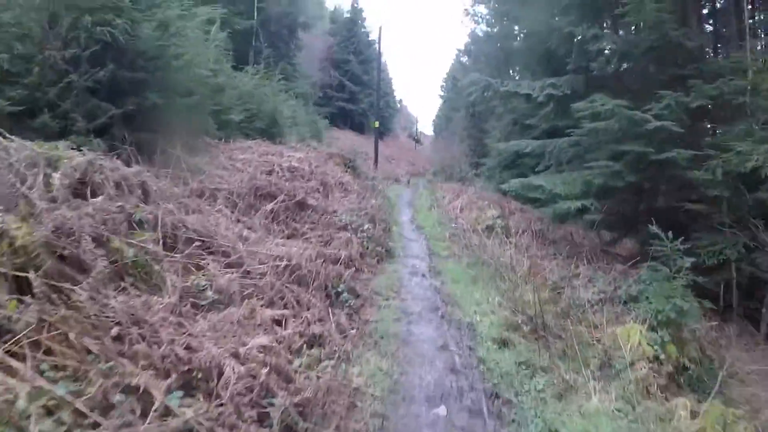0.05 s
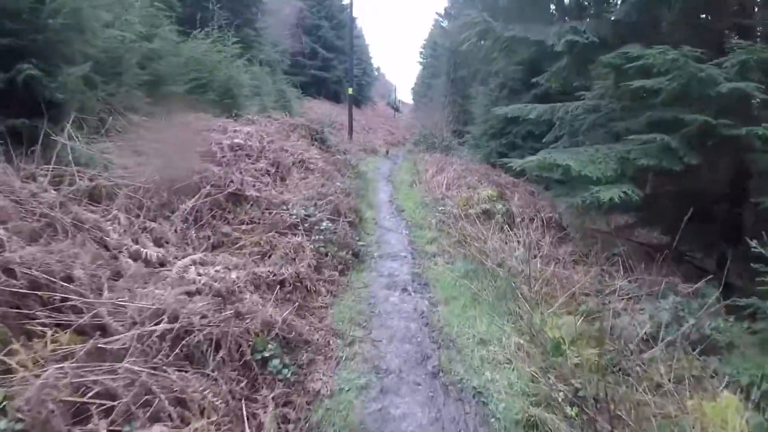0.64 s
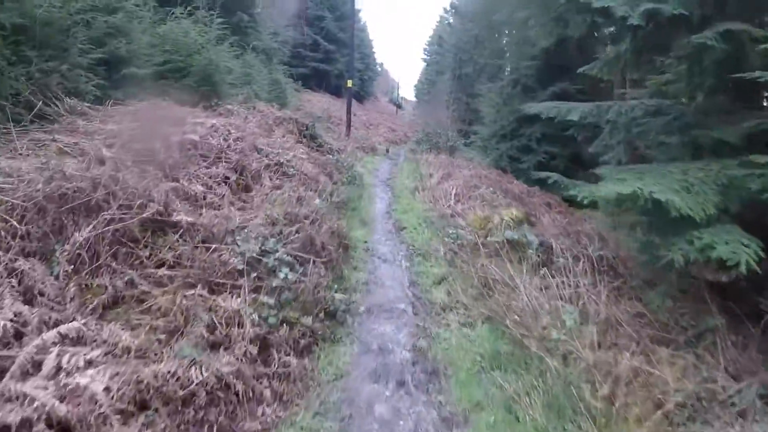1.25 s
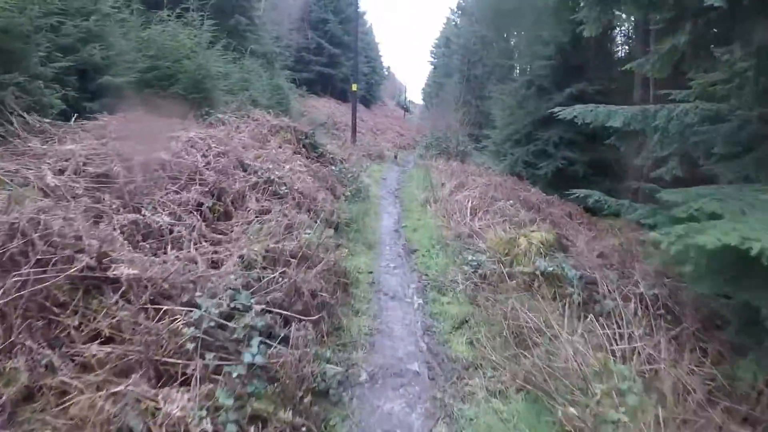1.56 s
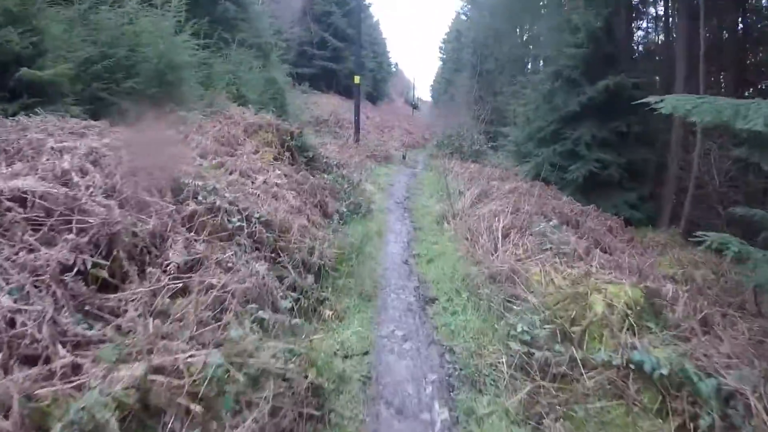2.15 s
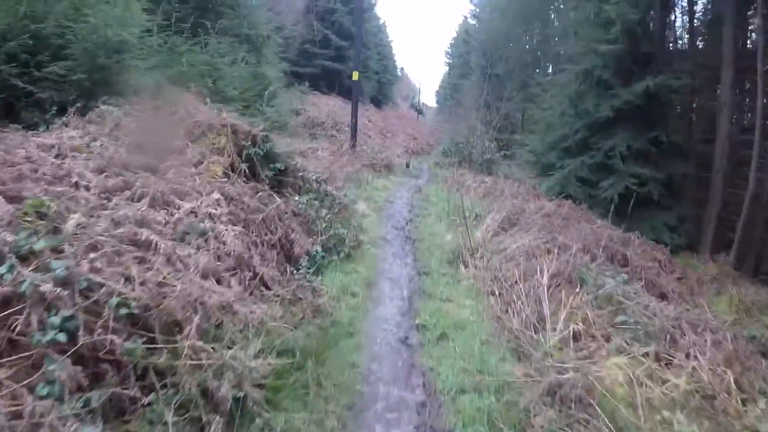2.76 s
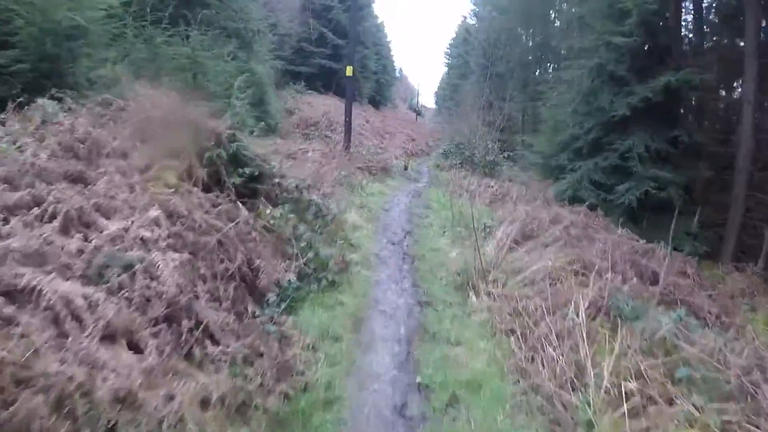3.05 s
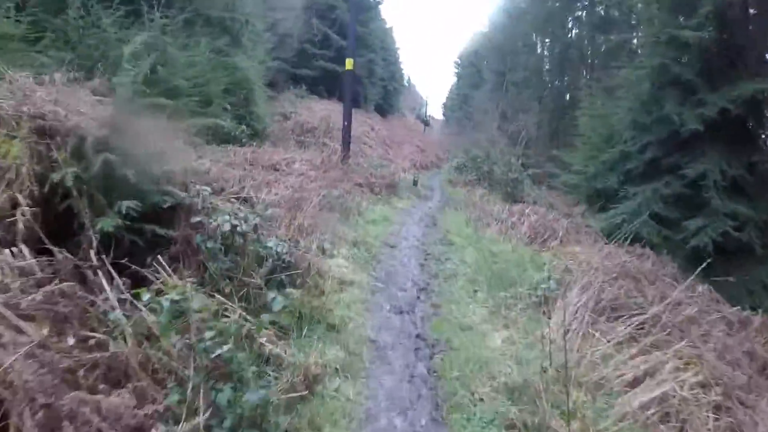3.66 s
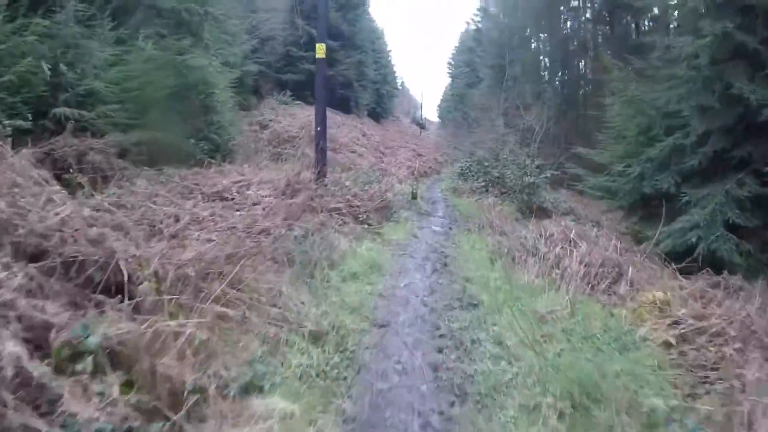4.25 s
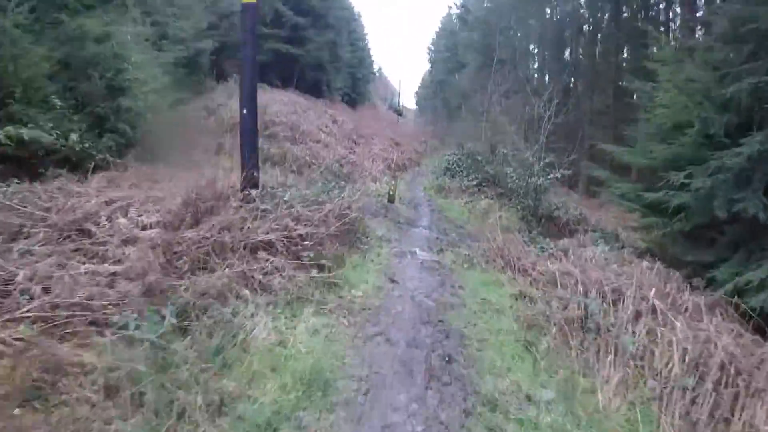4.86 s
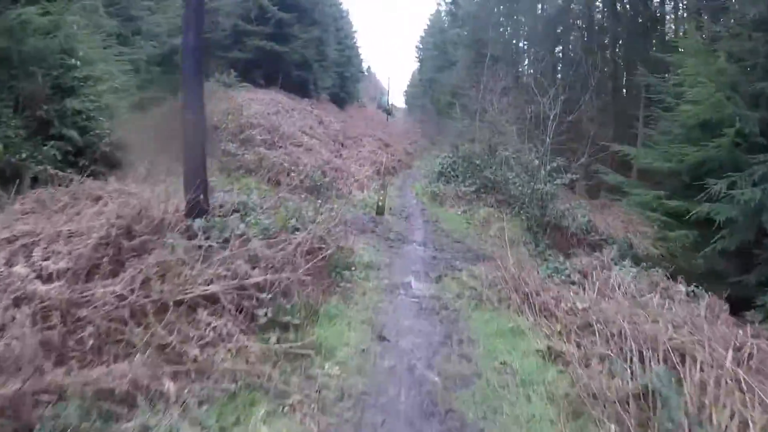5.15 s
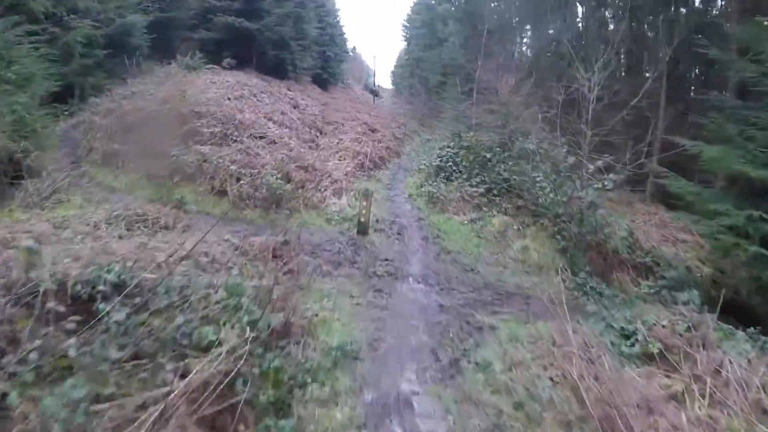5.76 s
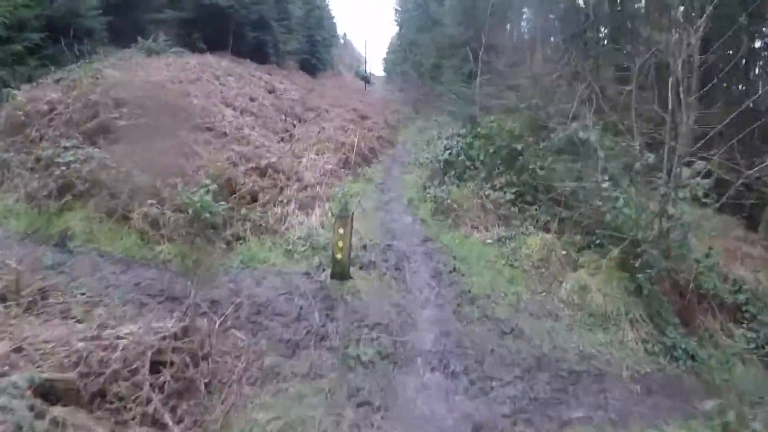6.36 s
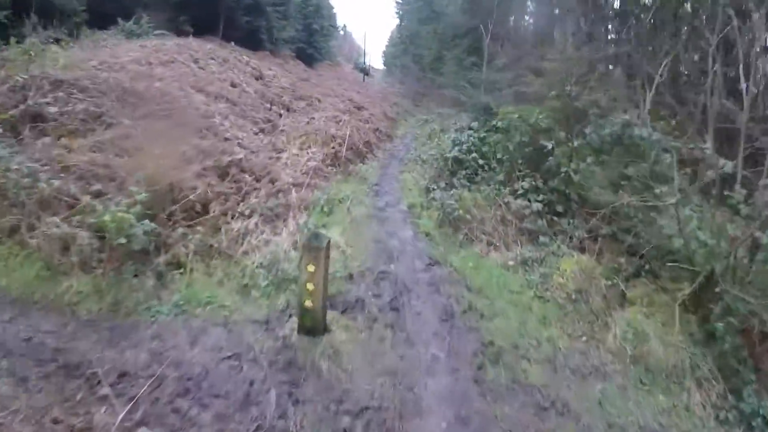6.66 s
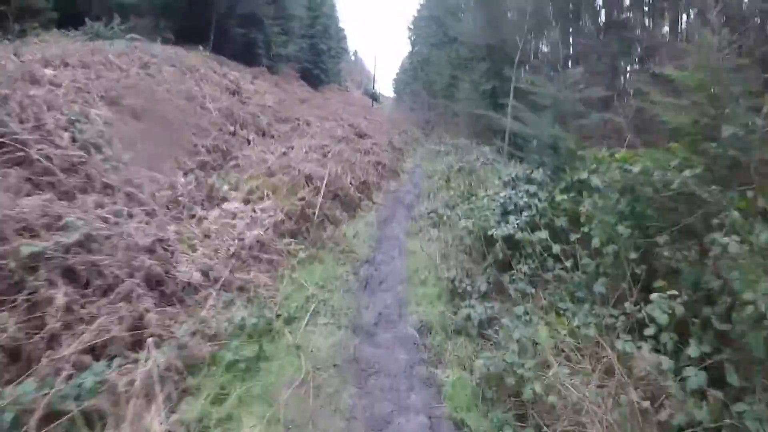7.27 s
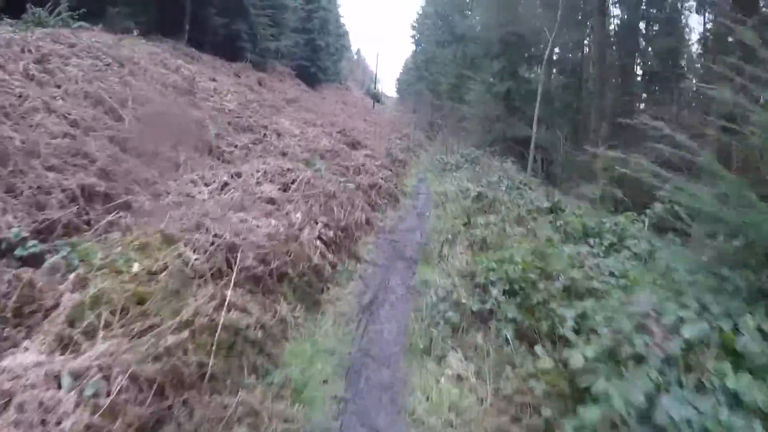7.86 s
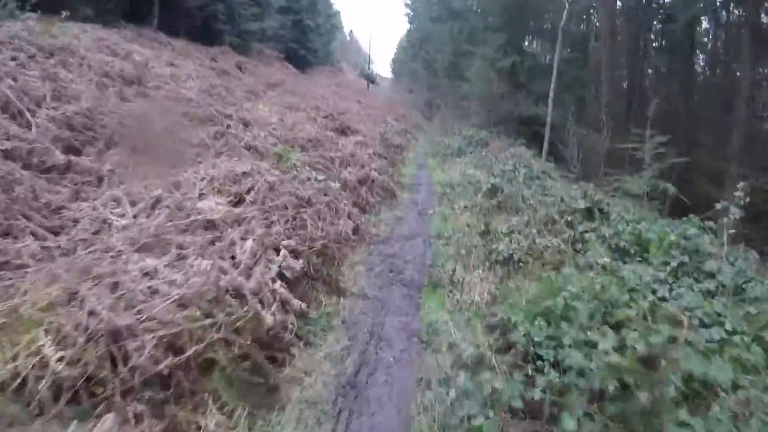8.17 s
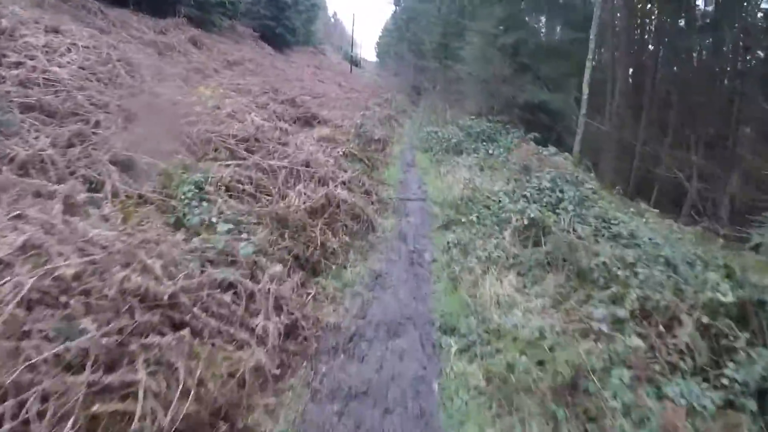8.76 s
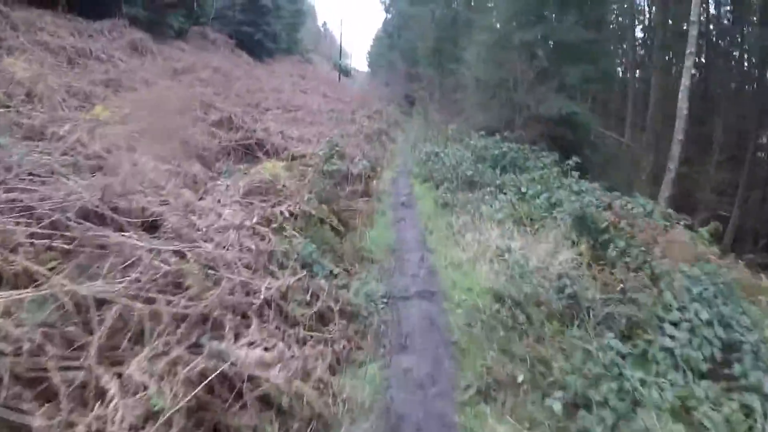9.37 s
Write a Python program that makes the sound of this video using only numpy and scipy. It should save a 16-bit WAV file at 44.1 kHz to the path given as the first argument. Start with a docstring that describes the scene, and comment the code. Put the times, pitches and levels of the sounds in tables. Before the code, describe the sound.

A mountain bike gathers speed along a muddy woodland path, heard close from a small camera on the rider. For the first two seconds the tyres hiss and crackle softly on wet ground, the chain and cables tick, and a brake sings faintly near 0.9 seconds. From about 2 seconds wind builds on the microphone as a low, buffeting rumble, while mud squelches, stones click and the frame knocks now and then. The hardest bumps come near 6.3 and 7.2 seconds, clusters of knocks and squelches that thud through the camera mount; the second brings a brief splash and a sizzle of water. The chain clinks against metal at 8.2 seconds. A few more knocks and squelches follow around 9 seconds, and the wind stays strong until the end at about 9.4 seconds. A dull, regular electrical putter runs underneath.

```python
"""A mountain bike gathers speed on a muddy woodland path, heard from a small camera on the rider.
At first the tyres hiss and crackle softly, chain and cables tick, and a brake sings faintly near 0.9 s.
From 2 s the wind builds on the microphone while mud squelches, stones click and the frame knocks.
The hardest bumps, near 6.3 s and 7.2 s, thud through the camera mount; the second brings a splash.
The chain clinks at 8.2 s, and the ride ends in strong wind over the dull putter of the camera's radio."""
import sys
import numpy as np
from scipy import signal
from scipy.fft import rfft, irfft
from scipy.io import wavfile
from scipy.ndimage import uniform_filter1d

SR = 44100
rng = np.random.default_rng(int(sys.argv[2]) if len(sys.argv) > 2 else 0)


def pcm_store(signal):
    """Save signal as 16-bit PCM."""
    levels = np.round(np.clip(np.atleast_2d(signal), -1, 1) * 32767)
    wavfile.write(sys.argv[1], SR, levels.astype(np.int16).T)


N = 415422
TIME = np.arange(N) / SR
HIT_TIME = np.arange(SR // 8) / SR  # time axis of one impact


# water sizzling off the tread: time_s, level_db
SIZZLE_CURVE = [(0, -34.5), (.25, -55.5), (1.1, -46), (1.7, -57), (2.6, -48), (3.3, -42.5), (3.65, -55),
                (4.0, -41.5), (4.95, -41), (5.4, -41.5), (6.0, -53), (6.45, -37.5), (6.85, -44),
                (7.15, -32), (7.75, -47.5), (8.5, -38), (9.42, -38)]
# spectra of the tread, the sizzle and the fine spray: frequency_hz, gain_db
TREAD_SPECTRUM = [(250, -17), (600, -2.5), (900, -7.5), (1250, -4), (1650, 0.5), (2200, -1.5), (2900, -2),
                  (3700, 0.5), (4450, 0.5), (5000, -5.5), (5600, -14.5), (7000, -36)]
SIZZLE_SPECTRUM = [(1500, -11.5), (2900, -4), (3300, -0.5), (4550, 1.5), (5000, -5), (5600, -27.5),
                   (8000, -40)]
SPRAY_SPECTRUM = [(4500, -21), (5700, -0.5), (6300, 6.5), (7100, 3.5), (7900, -4), (8700, -2), (9800, -5),
                  (11300, -18.5), (12700, -9), (15500, -32)]

def tyres():
    """Rolling noise: tread peels off wet ground in spurts, under a finer, steadier spray."""
    roll_db = rolling_level()
    sizzle_db, = in_time(SIZZLE_CURVE)
    grains, clicks = tread_bursts(per_s=700, spread_db=2.5, t60_cycles=5.4)
    bubbles, _ = tread_bursts(per_s=500, spread_db=2.0, t60_cycles=150)
    surge = crunches(per_s=42, strength=3.5, fade_s=.009)
    hiss = coloured(noise(), TREAD_SPECTRUM)
    tread = from_db(-2.5) * hiss + from_db(-4.5) * grains + from_db(-4.0) * bubbles
    sizzle = coloured(noise() + 0.5 * clicks, SIZZLE_SPECTRUM) * from_db(sizzle_db - 5.5)
    spray = coloured(noise() + 0.76 * clicks, SPRAY_SPECTRUM)
    wet_db = (roll_db + sizzle_db) / 2  # spray follows both tread and water
    spray_db = -62 + 0.94 * (wet_db - wet_db.mean())
    return (from_db(roll_db) * tread + sizzle) * surge + from_db(spray_db) * spray * np.sqrt(surge)


# rolling noise on firm ground: time_s, level_db
ROLLING_CURVE = [(0, -44), (.33, -55), (.55, -47), (1.75, -51), (2.7, -47.5), (3.7, -44.5), (4.9, -44),
                 (6.05, -46.5), (6.35, -45.5), (7.35, -40.5), (7.75, -44), (9.42, -43.5)]
# swells of hiss in wet patches: centre_s, level_db, half_width_s
WET_SWELLS = [(0.64, -43, 0.059), (1.183, -47, 0.1), (2.007, -45, 0.082), (3.177, -37, 0.04),
              (4.816, -33, 0.021), (5.04, -41.5, 0.064), (6.998, -34, 0.044), (7.244, -36.5, 0.094),
              (7.51, -34.5, 0.034), (8.877, -31, 0.021), (9.15, -36, 0.11)]

def rolling_level():
    """Incoherent sources add in power: firm ground plus wet patches, returned in dB."""
    firm_db, = in_time(ROLLING_CURVE)
    wet_power = sum(from_db(db) ** 2 * bell(s, half_s) for s, db, half_s in WET_SWELLS)
    return 10 * np.log10(from_db(firm_db) ** 2 + wet_power)


def tread_bursts(per_s, spread_db, t60_cycles, pitch_count=22):
    """Shot noise: grains or bubbles burst and resonate. Returns the ringing and the bare clicks."""
    sizes = from_db(spread_db * np.minimum(rng.exponential(1, N), 4))
    signs = rng.choice([-1, 1], N)
    clicks = sizes * signs * (rng.random(N) < per_s / SR)
    pitch_index = rng.integers(0, pitch_count, N)
    rings = sum(hz * ring(clicks * (pitch_index == k), hz, t60_cycles / hz)
                for k, hz in enumerate(np.geomspace(1100, 5000, pitch_count)))
    return rms_one(coloured(rings, TREAD_SPECTRUM)), rms_one(clicks)


def crunches(per_s, strength, fade_s):
    """Amplitude modulation: a gain that jumps as each clod gives way under the tread, then relaxes."""
    breaks = (rng.random(N) < per_s / SR) * np.minimum(rng.exponential(1, N), 2)
    power = signal.lfilter([1], [1, -np.exp(-1 / (fade_s * SR))], breaks + 1e-18)
    return rms_one(np.sqrt(1 + strength * power))


# mud squirting from under a tyre: start_s, level_db, pitch_hz
MUD_SQUIRTS = [(0.447, -28, 2780), (2.3337, -23, 3400), (3.1865, -23.5, 3830), (3.318, -22.5, 4200),
               (4.5093, -24, 3940), (4.805, -22.5, 1740), (4.935, -27, 3160), (4.988, -26, 3000),
               (5.241, -31, 3900), (5.329, -31, 3600), (6.1905, -22.5, 1940), (6.267, -20.5, 1400),
               (6.327, -19.5, 1100), (6.3432, -16.5, 2320), (6.537, -20, 1390), (6.5889, -20, 1520),
               (6.979, -18.5, 2300), (6.994, -25.5, 2300), (7.02, -29, 4200), (7.041, -28, 3400),
               (7.076, -25, 3400), (7.198, -20, 3600), (7.215, -18.5, 4500), (7.238, -20, 2620),
               (8.777, -27, 3800), (8.879, -21.5, 1740), (9.039, -27, 4400), (9.163, -27, 4500),
               (9.319, -18.5, 3450)]

def squelches(swell_s=0.0079, droplet_fade_s=0.01):
    """Damped resonance: spatter excites a pocket in the mud; higher squirts throw more droplets."""
    out = np.zeros(N)
    age = HIT_TIME / swell_s
    for s, db, hz in MUD_SQUIRTS:
        spatter = noise(len(age)) * age * np.exp(-age)
        pocket = ring(spatter, hz, 1.56 / hz)
        add(out, s - .002, at_level(coloured(pocket, TREAD_SPECTRUM), db - 8.5))
        droplets = noise(len(age)) * np.sqrt(age) * np.exp(-HIT_TIME / droplet_fade_s)
        add(out, s, at_level(coloured(droplets, SPRAY_SPECTRUM), db - 27.5) * hz / 3050)
    return out


# puddle water spraying up: centre_s, level_db
PUDDLE_SPLASHES = [(7.156, -56), (7.222, -49), (7.362, -56)]

def splashes():
    """Superposition: a fan of fine drops merges into a brief swell of bright noise."""
    drops = rms_one(highpass(noise(), hz=6500, order=2))
    return drops * sum(from_db(db) * bell(s, half_width_s=0.015) for s, db in PUDDLE_SPLASHES)


# big stones clicking out from under a tyre: start_s, level_db, pitch_hz
STONE_CLICKS = [(2.537, -29, 3280), (3.745, -28.5, 2600), (4.063, -26.5, 3250), (4.097, -28.5, 3600),
                (4.599, -30, 3900), (5.7213, -29.5, 3620), (5.787, -29, 4460), (5.939, -33, 3620),
                (9.3913, -29.5, 1490)]

def stones(grit_per_s=30, shower_db=7):
    """Poisson impacts: a few big stones click, while grit of drifting rate falls in showers."""
    big, small = np.zeros((2, N))
    for s, db, hz in STONE_CLICKS:
        add(big, s, at_level(coloured(pebble(hz), TREAD_SPECTRUM), db + 0.5))
    shower = from_db(shower_db * drift(5))
    grain_chance = grit_per_s * shower / shower.mean() / SR
    for s in TIME[rng.random(N) < grain_chance]:
        grain = pebble(hz=rng.uniform(1400, 4600))
        add(small, s, at_level(grain, db=rng.uniform(-8, 0)))
    return big + rms_one(coloured(small, TREAD_SPECTRUM)) * from_db(rolling_level() - 8)


def pebble(hz):
    """Sudden release: a pinched stone lets go with one short, pitched click."""
    push = contact(chatter_db=-10, chatter_s=.002, tail_db=-28, tail_s=.008)
    return ring(push, hz, 7 / hz)


# the frame jolting over stones and roots: start_s, level_db, pitch_hz
FRAME_KNOCKS = [(0.822, -22.5, 1330), (1.425, -29, 1190), (2.507, -22, 1030), (3.249, -20, 1230),
                (3.416, -16.5, 1010), (3.545, -17.5, 1310), (5.722, -24, 1350), (5.731, -21, 1350),
                (5.942, -21.5, 1300), (6.09, -21, 1810), (6.233, -12, 1320), (6.263, -14.5, 1660),
                (6.3094, -14, 1310), (6.427, -18.5, 1730), (7.182, -12.5, 1500), (7.237, -13.5, 566),
                (7.849, -18, 1180), (9.211, -15, 1140)]
# modes of the frame: pitch_ratio, gain_db, t60_s
FRAME_MODES = [(.42, -6, 0.013), (.7, -1, 0.0056), (1, 2.5, 0.0095), (1.35, -1.5, 0.0066), (2, -1, 0.0023)]
# the tyre's thump under each knock: frequency_hz, gain_db
THUMP_SPECTRUM = [(120, -21), (300, 17.5), (550, 6), (1000, -22), (1800, -16), (4000, -40)]

def knocks():
    """Modal ringing: the frame sounds over a tyre thump; harder blows rattle loose parts more."""
    out = np.zeros(N)
    for s, db, hz in FRAME_KNOCKS:
        push = contact(chatter_db=-14, chatter_s=.002, tail_db=db - 13, tail_s=.016)
        add(out, s, at_level(struck(push, FRAME_MODES, hz, detune=0.045), db - 10.5))
        add(out, s + 0.00194, at_level(coloured(push, THUMP_SPECTRUM), db - 14))
    return out


# chain and cables ticking: start_s, ring_db, pitch_hz, crack_db, snap_db
CHAIN_TICKS = [(0.5366, -24, 1810, -25, -35), (0.7231, -30.5, 1640, -24.5, -38),
               (1.0533, -28, 1700, -22.5, -33.5), (1.185, -29, 1620, -21, -37),
               (1.3105, -27.5, 1580, -28.5, -34), (1.4782, -25, 1700, -22.5, -40),
               (2.23, -26.5, 1730, -26.5, -34.5), (2.3878, -31.5, 1670, -23.5, -41),
               (2.877, -30.5, 1680, -27.5, -35.5), (3.05, -31, 1530, -24.5, -40),
               (7.29, -20, 1520, -17.5, -37), (9.319, -21, 1880, -21.5, -44)]
# links landing within one tick: delay_s, gain_db
LINK_TOUCHES = [(0, -7), (.0007, -1), (.0017, -3.5), (.0072, -6)]
# modes of a tick: pitch_ratio, gain_db, t60_s
CHAIN_MODES = [(1.01, 2.5, 0.023), (0.67, -3.5, 0.0042), (1.23, -3.5, 0.007), (1.75, -1, 0.0045)]
# spectra of the dry crack and the brighter snap: frequency_hz, gain_db
CRACK_SPECTRUM = [(900, -25), (2500, 0.5), (3900, 8), (4800, 3.5), (5600, -8), (9000, -57)]
SNAP_SPECTRUM = [(3500, 2.5), (5000, -0.5), (5850, -16), (7000, 5), (8600, 1), (11000, -10.5), (16000, -13)]

def ticks():
    """Brief contacts have broad spectra: landing links crack and snap over a short ring."""
    out = np.zeros(N)
    for s, ring_db, hz, crack_db, snap_db in CHAIN_TICKS:
        clack = np.zeros(len(HIT_TIME))
        for delay_s, touch_db in LINK_TOUCHES:
            touch = contact(chatter_db=-13, chatter_s=.0008, tail_db=-31, tail_s=.009)
            lag = abs(round(delay_s * rng.normal(1, .2) * SR))
            clack += from_db(touch_db) * np.pad(touch, (lag, 0))[:len(clack)]
        push = contact(chatter_db=-17, chatter_s=.0012, tail_db=-36, tail_s=.009)
        add(out, s + 0.00029, at_level(struck(push, CHAIN_MODES, hz, detune=0.022), ring_db + .5))
        add(out, s, at_level(coloured(clack, CRACK_SPECTRUM), crack_db - 2.9))
        add(out, s, at_level(coloured(clack, SNAP_SPECTRUM), snap_db))
    return out


# the chain slapping loose metal: start_s, level_db
CHAIN_SLAPS = [(8.2096, -16), (8.2211, -18.5)]
# modes of that metal: pitch_hz, gain_db, t60_s
METAL_MODES = [(1390, -5, 0.013), (1830, -6, 0.027), (2330, 1.5, 0.0089), (2690, 1.5, 0.021),
               (3210, -2.5, 0.021), (3800, 4.5, 0.0056)]

def clinks():
    """Light damping: metal on metal rings longer and higher than the frame."""
    out = np.zeros(N)
    for s, db in CHAIN_SLAPS:
        push = contact(chatter_db=-34, chatter_s=0.0011, tail_db=-16, tail_s=0.016)
        rings = sum((-1) ** k * from_db(mode_db) * ring(push, hz, t60_s)
                    for k, (hz, mode_db, t60_s) in enumerate(METAL_MODES))
        add(out, s, at_level(rings, db - 6.0))
    return out


def brake():
    """Friction drives a resonance: the disc brushes its pad and sings for a moment."""
    song = rms_one(ring(noise(), hz=1340, t60_s=0.02))
    return song * from_db(-49.5) * bell(centre_s=.9, half_width_s=0.11)


# gusts and jolts on the camera: start_s, level_db, pitch_hz
MOUNT_THUDS = [(2.809, -17, 216), (3.855, -18, 283), (3.882, -14.5, 103), (5.828, -17.5, 108),
               (6.314, -7.5, 119), (6.358, -8.5, 119), (7.232, -8.5, 366), (7.366, -8.5, 123),
               (7.42, -7, 110), (7.544, -9, 226), (8.667, -15, 194), (9.212, -12, 120), (9.345, -11.5, 226)]

def thuds(mount_hz=129.3):
    """A damped mass on a spring: each gust, jolt or frame knock rocks the camera mount."""
    out = np.zeros(N)
    from_frame = [(s, db - 2, mount_hz) for s, db, _ in FRAME_KNOCKS]
    for s, db, hz in MOUNT_THUDS + from_frame:
        shove = np.exp(-HIT_TIME * hz * 3) * HIT_TIME
        velocity = np.diff(ring(shove, hz, 12 / hz))
        add(out, s, at_level(velocity, db - 6.0))
    return out


# airflow over the microphone, rising with speed: time_s, level_db
AIRFLOW_CURVE = [(0, -40), (1.7, -39), (2.8, -35), (3.9, -30.5), (5.2, -31), (6.1, -32), (7.25, -25),
                 (8.1, -27.5), (9.42, -24.5)]
# spectra of deep rumble, buffeting and the rush of small eddies: frequency_hz, gain_db
RUMBLE_SPECTRUM = [(12, -20.5), (24, 9), (45, 3), (90, -6.5), (200, -14.5), (600, -59.5)]
BUFFET_SPECTRUM = [(25, -13.5), (60, -1), (115, -1), (150, -4), (210, -5.5), (300, -12), (1000, -71)]
RUSH_SPECTRUM = [(100, -11), (200, -3.5), (270, 0.5), (350, 0.5), (450, -2.5), (600, -8), (850, -14.5),
                 (1400, -19.5), (6000, -79)]

def wind():
    """Turbulence: eddies shake the microphone, and the higher bands grow faster with airflow."""
    flow_db, = in_time(AIRFLOW_CURVE)
    gust_db = flow_db - flow_db.mean()
    eddies = drift(17.2)
    rumble = coloured(noise(), RUMBLE_SPECTRUM) * from_db(1.3 * eddies + 1.15 * drift(4.5))
    buffet = coloured(noise(), BUFFET_SPECTRUM) * from_db(2.0 * eddies)
    rush = coloured(noise(), RUSH_SPECTRUM) * from_db(2.0 * eddies + 1.4 * drift(38.0))
    return (rms_one(rumble) * from_db(-37.5 + 0.79 * gust_db)
            + rms_one(buffet) * from_db(-35 + 1.14 * gust_db)
            + rms_one(rush) * from_db(-43.5 + 1.57 * gust_db))


# a soft, regular putter in the microphone: time_s, level_db
PUTTER_CURVE = [(0, -33), (1.6, -31), (2.4, -26.5), (9.42, -24.5)]

def putter(beacon_period_s=.1024, pulse_s=.006):
    """Electrical interference: the current for each beacon of the camera's radio leaks in as a pulse."""
    level_db, = in_time(PUTTER_CURVE)
    since_beacon_s = (TIME - .0198) % beacon_period_s
    current = np.sin(np.pi * np.minimum(since_beacon_s / pulse_s, 1))
    return at_level(highpass(current, hz=22, order=1), level_db)


# air and distant trees: frequency_hz, gain_db
AIR_SPECTRUM = [(150, -3.5), (450, 2.5), (750, -4), (1300, -1), (2000, -9), (4500, -23.5), (9500, -19),
                (15500, -33.5)]

def air():
    """Stationary noise: an even wash behind the bike."""
    return from_db(-52) * coloured(noise(), AIR_SPECTRUM)


def contact(chatter_db, chatter_s, tail_db, tail_s):
    """Impact force: one impulse, a brief chatter of the touching parts and a longer tail."""
    chatter = from_db(chatter_db) * np.exp(-HIT_TIME / chatter_s)
    tail = from_db(tail_db) * np.exp(-HIT_TIME / tail_s)
    return signal.unit_impulse(len(tail)) + (chatter + tail) * noise(len(tail))


def struck(push, modes, hz, detune):
    """Modal sum: each blow lands on another spot, so its modes vary in strength and pitch."""
    out = 0
    for k, (ratio, db, t60_s) in enumerate(modes):
        gain = (-1) ** k * from_db(rng.normal(db, 3.1))
        out += gain * ring(push, hz * ratio * rng.normal(1, detune), t60_s)
    return out


def ring(push, hz, t60_s):
    """Damped oscillator: a unit impulse starts a decaying sine of height 1."""
    r = from_db(-60 / (t60_s * SR))
    w = 2 * np.pi * hz / SR
    return signal.lfilter([0, np.sin(w)], [1, -2 * r * np.cos(w), r * r], push + 1e-18)


def coloured(x, spectrum, size=4096):
    """Minimum-phase filter with the given spectrum; keeps the power of white noise."""
    hz, db = np.transpose(spectrum)
    log_hz = np.log(np.maximum(np.fft.rfftfreq(size, 1 / SR), 1))
    magnitude = from_db(np.interp(log_hz, np.log(hz), db))
    cepstrum = irfft(np.log(magnitude))
    cepstrum[1:size // 2] *= 2  # folding onto positive time makes it causal
    cepstrum[size // 2 + 1:] = 0
    response = irfft(np.exp(rfft(cepstrum)))
    return signal.oaconvolve(x, response / np.linalg.norm(response))[:len(x)]


def drift(rate_hz, step=40, settle=2000):
    """Low-passed noise: a smooth random wander of spread 1."""
    r = np.exp(-2 * np.pi * rate_hz * step / SR)
    slow = signal.lfilter([1], [1, -2 * r, r * r], noise(N // step + settle + 2))[settle:]
    return np.interp(np.arange(N) / step, np.arange(len(slow)), rms_one(slow))


def at_level(x, db):
    """Scales a sound so that its loudest 3 ms have the given level."""
    return x * from_db(db) / np.sqrt(uniform_filter1d(x * x, 132).max())


def add(track, start_s, x):
    """Mixes a short sound into the track."""
    i = max(round(start_s * SR), 0)
    track[i:i + len(x)] += x[:N - i]


def in_time(rows):
    """Interpolates each column of a curve, sample by sample."""
    time_s, *columns = np.transpose(rows)
    return [np.interp(TIME, time_s, column) for column in columns]


def bell(centre_s, half_width_s):
    return np.exp(-((TIME - centre_s) / half_width_s) ** 2)


def highpass(x, hz, order):
    return signal.sosfilt(signal.butter(order, hz, "high", fs=SR, output="sos"), x)


def noise(length=N):
    return rng.standard_normal(length)


def from_db(db):
    return 10 ** (np.asarray(db) / 20)


def rms_one(x):
    return x / np.sqrt(np.mean(x ** 2) + 1e-20)


def scene():
    """Superposition: bike, air and camera noises add in one channel."""
    bike = tyres() + squelches() + splashes() + stones() + ticks() + knocks() + clinks() + brake()
    return (bike + wind() + air() + thuds() + putter())[None]


def record(dry):
    """Band limiting: the deepest rumble is cut, and the treble ends steeply at 15.4 kHz."""
    lowpass = signal.ellip(10, .3, 80, 15400, fs=SR, output="sos")
    return signal.sosfilt(lowpass, highpass(dry, hz=18, order=2))


dry = scene()
out = record(dry)
pcm_store(out)
```